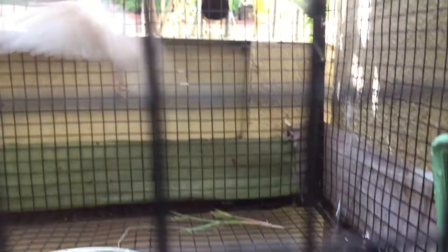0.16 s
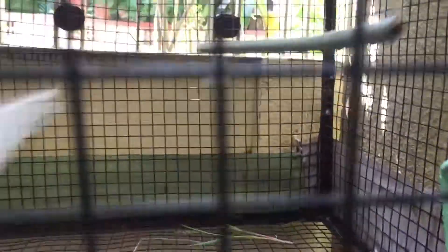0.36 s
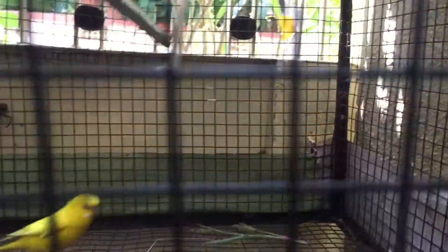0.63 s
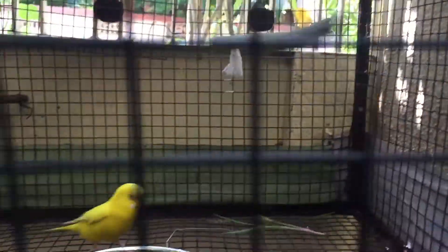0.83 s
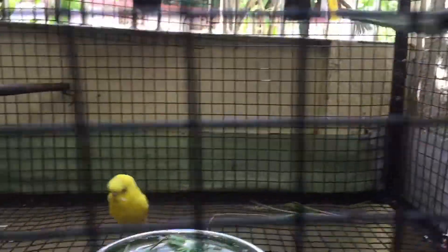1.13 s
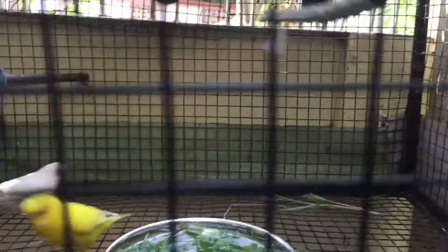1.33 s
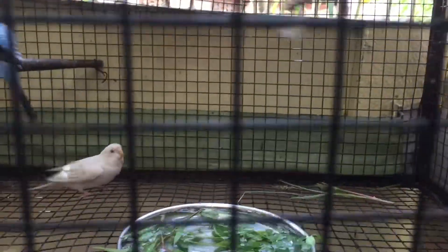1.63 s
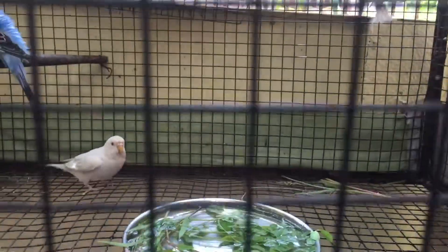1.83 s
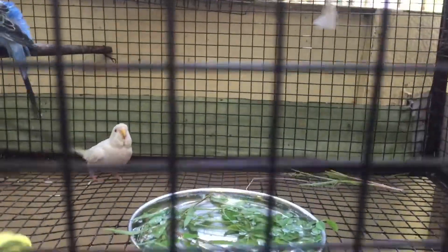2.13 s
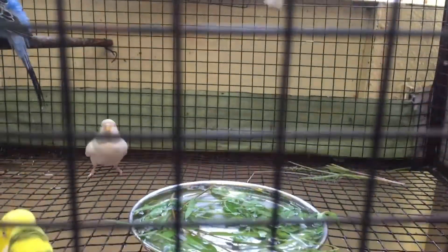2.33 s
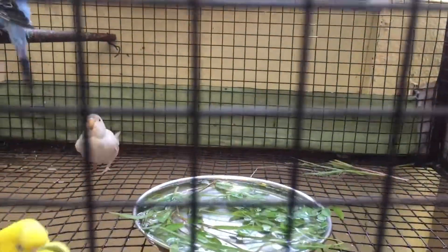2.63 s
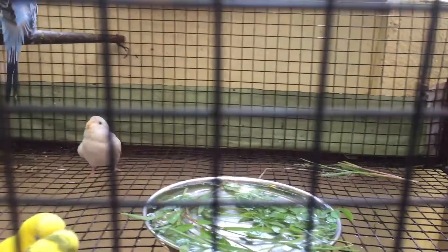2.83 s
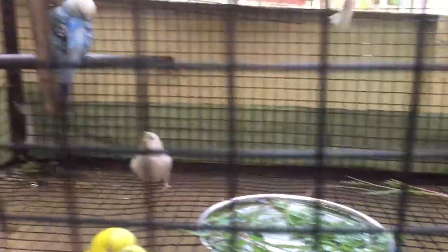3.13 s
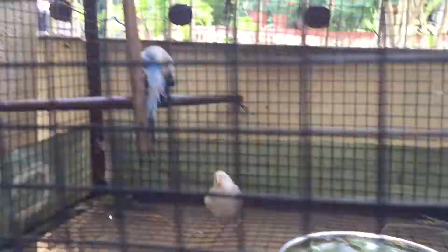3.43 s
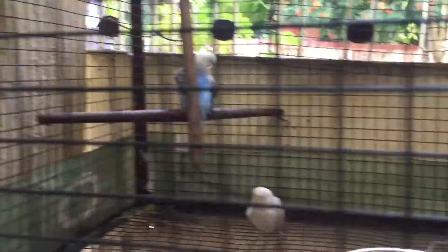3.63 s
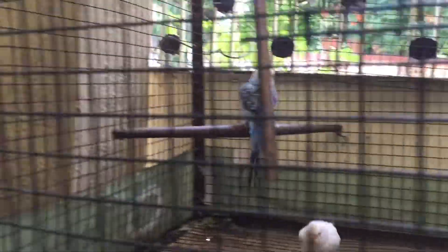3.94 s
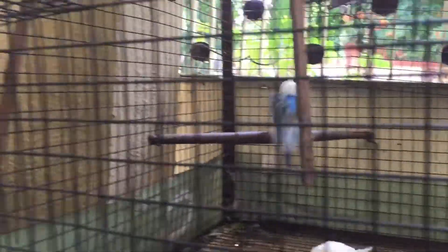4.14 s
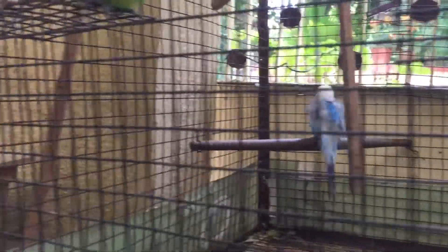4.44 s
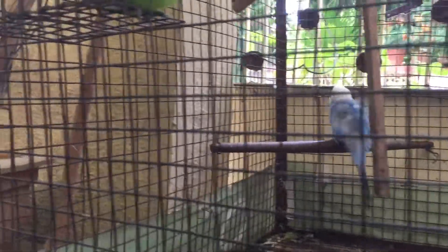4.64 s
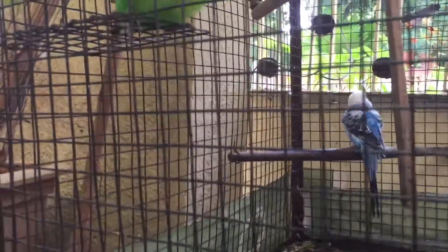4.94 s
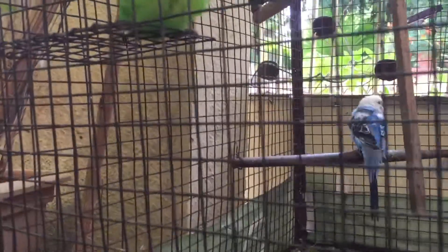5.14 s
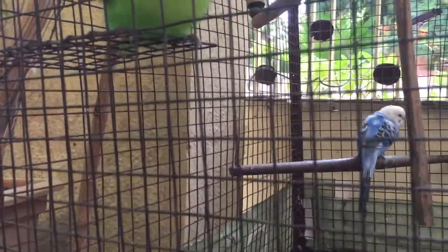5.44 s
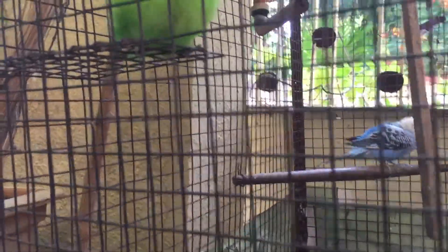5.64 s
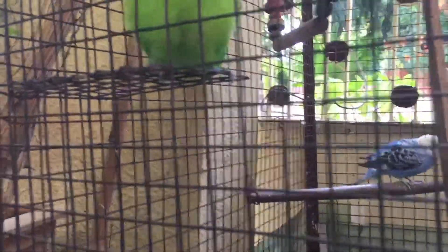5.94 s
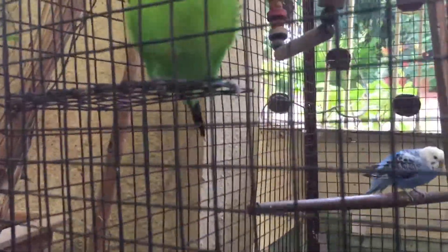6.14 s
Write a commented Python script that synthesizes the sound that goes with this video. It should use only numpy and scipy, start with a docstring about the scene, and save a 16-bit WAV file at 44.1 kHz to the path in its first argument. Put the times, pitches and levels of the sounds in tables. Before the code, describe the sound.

Wing flaps and claw ticks on wire, then chattering budgerigars: gliding chirps, loud raspy squawks, a feather shake, soft rumble behind.

```python
"""Budgerigars chatter in a wire cage on a porch, close to a handheld microphone, over a low outdoor rumble.
First one flies across the cage: shaped noise makes its wings, quickly dying modes its claws on the mesh.
From the start they warble in gliding sums of sines that break into roughness; soft bumps are slow sines.
Short rattling squawks, noise pulsed and filtered by a throat, join next, and thin wavering tones ring.
A feather shake, warbling and soft hisses follow to the end, where a hollow noise drone grows; walls echo."""
import sys
import numpy as np
from scipy import signal
from scipy.fft import rfft, irfft, next_fast_len
from scipy.io import wavfile
from scipy.ndimage import uniform_filter1d

SR = 44100
rng = np.random.default_rng(int(sys.argv[2]) if len(sys.argv) > 2 else 0)


def generate_wav(signal):
    """Clip the signal to [-1, 1] and save it as 16-bit WAV at the path in sys.argv[1]."""
    frames = np.transpose(np.atleast_2d(signal))
    scaled = np.clip(frames, -1, 1) * 32767
    pcm = np.round(scaled).astype(np.int16)
    wavfile.write(sys.argv[1], SR, pcm)


N = 276507


def gain_of(db):
    """Logarithmic level: decibels to amplitude."""
    return 10 ** (np.asarray(db) / 20)


def evened(x):
    """Normalisation: scales to an rms of one."""
    return x / np.sqrt(np.mean(x ** 2) + 1e-20)


def read(points, hz):
    """Spectral interpolation: reads a table on a log-frequency axis."""
    f, value = np.transpose(points)
    return np.interp(np.log(hz + 1), np.log(f + 1), value)


def level(points):
    """Level contour: gain at every sample from rows of (t/s, level/dB)."""
    return gain_of(np.interp(np.arange(N) / SR, *np.transpose(points)))


def add(mix, s, sound):
    """Superposition: mixes a sound in at time s."""
    part = mix[max(round(s * SR), 0):][:len(sound)]
    part += sound[:len(part)]


def coloured(x, db_at):
    """Linear filtering: multiplies the spectrum of x by a gain in dB given as a function of frequency."""
    size = next_fast_len(len(x) + 512)
    hz = np.fft.rfftfreq(size, 1 / SR)
    return irfft(rfft(x, size) * gain_of(db_at(hz)), size)[:len(x)]


def noise(spectrum):
    """Stationary random noise: white noise filtered to the given spectrum, at an rms of one."""
    return evened(coloured(rng.standard_normal(N), lambda hz: read(spectrum, hz)))


def wander(count, hz):
    """Band-limited random motion: noise mostly slower than hz, at an rms of one."""
    return evened(coloured(rng.standard_normal(count), lambda f: -20 * np.log10(1 + (f / hz) ** 4)))


def edges(t, attack, release):
    """Amplitude envelope: attack, hold and release over the times t."""
    return np.clip(np.minimum(t / attack, (t[-1] - t) / release), 0, 1)


def outdoor_air(level_db=-60.5):
    """Broadband noise of the open air, whose level fluctuates slowly."""
    # spectrum of the air, relative: f/Hz, level/dB
    air_spectrum = [(200, -6), (400, -1.5), (700, -6), (1500, -7), (3400, -12.5), (7000, -23.5),
                    (11000, -30), (15800, -31.5)]
    flicker_db = 0.74 * wander(N, 5.5)
    return gain_of(level_db) * noise(air_spectrum) * gain_of(flicker_db)


def low_rumble(hum_db=-2.5, hum_hz=97, hum_drift=.075, throb_hz=10.7, throb_depth=1.0, rumble_db=-1):
    """Low-frequency noise with an amplitude-modulated hum, whose pitch and throb drift together."""
    # spectrum of the rumble, relative: f/Hz, level/dB
    rumble_spectrum = [(15, -59), (27, -32.5), (38, -12.5), (55, 0), (80, 3), (100, 4), (120, 5.5),
                       (150, -7), (220, -23.5), (400, -41), (800, -80.5)]
    # level contour that scales both noise and hum: t/s, level/dB
    rumble_contour = [(0, -66), (.4, -50), (.8, -58.5), (1.4, -52.5), (2.6, -49.5), (3.6, -57), (4.2, -55),
                      (5.4, -50.5), (6.27, -51.5)]
    pace = np.cumsum(1 + hum_drift * wander(N, 5.4)) / SR
    throb = 1 + throb_depth * np.sin(2 * np.pi * throb_hz * pace)
    hum = np.sin(2 * np.pi * hum_hz * pace) * throb
    rumble = gain_of(rumble_db) * noise(rumble_spectrum)
    return level(rumble_contour) * (rumble + gain_of(hum_db) * hum)


def hollow_drone():
    """Band-shaped noise above the rumble, randomly modulated in level and growing toward the end."""
    # spectrum of the drone, relative: f/Hz, level/dB
    drone_spectrum = [(90, -27.5), (160, -1), (205, 1.5), (270, -7), (345, 0), (450, -21), (900, -44.5),
                      (2000, -80)]
    # level contour of the drone: t/s, level/dB
    drone_contour = [(0, -66), (.5, -53.5), (.75, -61.5), (2.3, -61), (2.6, -53), (2.9, -61), (4.8, -62),
                     (5.4, -51.5), (5.95, -60.5), (6.25, -44)]
    flicker_db = 3.9 * wander(N, 9.5)
    return level(drone_contour) * noise(drone_spectrum) * gain_of(flicker_db)


def whistle(s, length, first_hz, last_hz, db, swell_db, roughness, overtone_db,
            chaos_hz=800, flutter_db=1.6, overtone_fall_db=7, hiss_db=-38):
    """Two oscillators: both sides of the syrinx follow one glide; the second joins as the note roughens."""
    # what the beak lets out of a whistle: f/Hz, gain/dB
    beak = [(500, -24.5), (900, -7), (2800, 5), (4300, 7), (5200, 0), (7000, -1.5), (9300, 6.5),
            (10400, -9), (11200, -12.5), (16000, -16)]
    glide_ease = 1.7  # a note glides fast at first, then settles on its last pitch
    attack_s, release_s = 0.0023, 0.0025
    catch_rough, catch_s = 0.092, 0.0026  # each note starts rougher; the excess decays exponentially
    jitter, shimmer, waver = .21, .45, .014  # relative rms depths; roughness scales the first two
    t = np.arange(0, length, 1 / SR)
    glide = last_hz + (first_hz - last_hz) * (1 - t / length) ** glide_ease
    hz = glide * (1 + waver * wander(len(t), 200))
    rough = np.clip(roughness + catch_rough * np.exp(-t / catch_s), 0, 1)

    # six harmonics, weighted by the beak, none above half the sample rate
    k = np.arange(1, 7)[:, None]
    source_db = (k > 1) * (overtone_db - overtone_fall_db * (k - 2))
    partials = gain_of(source_db + read(beak, k * hz)) * (k * hz < SR / 2)
    partials /= np.sqrt((partials ** 2).sum(0) / 2) + 1e-9

    # the second side takes a larger share as the note roughens
    second_share = np.clip(.9 * rough, 0, .7)
    sides = (np.sqrt(1 - second_share ** 2), rough), (second_share, .5 * rough + .4)
    tone = 0
    for share, unrest in sides:
        side_hz = hz * (1 + jitter * unrest * wander(len(t), chaos_hz))
        phase = 2 * np.pi * np.cumsum(side_hz) / SR
        tone = tone + share * (partials * np.sin(k * phase)).sum(0)

    flutter = gain_of(flutter_db * wander(len(t), 160))
    shake = (1 + shimmer * rough * wander(len(t), chaos_hz)) * flutter
    breath = evened(coloured(rng.standard_normal(len(t)), lambda f: read(beak, f)))
    hiss = gain_of(hiss_db) * (1 + 8 * rough) * breath
    swell = gain_of(db + swell_db * (t / length - .5))
    return s, swell * edges(t, attack_s, release_s) * (tone * shake + hiss)


def early_echoes(s, call):
    """Comb interference: each note gets three early echoes at random delays, which beat against the glide."""
    heard = np.pad(call, (0, SR // 50))
    for delay in rng.uniform(.003, .011, size=3):
        add(heard, delay, .17 * call)
    return s, heard


def soft_hiss(s, length, db, bright_db, flicker_db=2.0, flicker_hz=31):
    """Filtered noise under an envelope: an uneven, dull or bright rush that starts quickly and dies down."""
    # spectrum of the hisses before the brightness tilt, relative: f/Hz, level/dB
    hiss_spectrum = [(100, -12), (350, 1), (700, 1), (1300, -6), (4000, -12.5), (8000, -13), (15000, -15.5)]
    rise_s, fade_db, stop_s = 0.023, -7.5, 0.038  # the fade spans the whole length
    t = np.arange(0, length, 1 / SR)

    def rush_db(hz):
        return read(hiss_spectrum, hz) + bright_db * np.log2(1 + hz / 500)

    rush = evened(coloured(rng.standard_normal(len(t)), rush_db))
    envelope = gain_of(db + fade_db * t / length) * edges(t, rise_s, stop_s)
    return s, envelope * rush * gain_of(flicker_db * wander(len(t), flicker_hz))


def tick(s, db, t60, centre_hz, slope_db=11):
    """Modal decay: a sharp scratch on wire as a dense cluster of quickly dying modes."""
    t = np.arange(0, .1, 1 / SR)

    def modes_db(hz):
        return -slope_db * abs(np.log2((hz + 100) / centre_hz))

    modes = evened(coloured(rng.standard_normal(len(t)), modes_db))
    return s, modes * gain_of(db - 60 * t / t60)


def bump(s, length, db, hz):
    """Low-frequency oscillation: a few slow swings of a dull knock under a half-sine envelope."""
    t = np.arange(0, length, 1 / SR)
    swing = np.sqrt(2) * np.sin(2 * np.pi * hz * t)
    return s, gain_of(db) * np.sin(np.pi * t / length) * swing


def squawk(s, length, db, rate, crest, throat, bright_db, closure,
           open_share=0.79, arch=1, drift=0.034, ripple_db=1.0):
    """Source and filter: brief, chaotic bursts from the syrinx swell and fade through throat resonances."""
    # throat and open beak during a squawk: f/Hz, gain/dB
    open_tract = [(300, -27), (850, -59.5), (1200, -40), (1650, -21), (2300, -13.5), (3000, -3.5),
                  (4600, -6.5), (6000, 0), (6900, 5.5), (7900, -12), (9500, -12.5), (10600, -15),
                  (13000, -22), (15800, -26.5)]
    # the same throat with the beak nearly shut: f/Hz, gain/dB
    shut_tract = [(300, -31.5), (1050, -33.5), (1500, -8.5), (2000, -0.5), (2600, -8), (3900, -5.5),
                  (4600, 7), (5500, -1), (6700, -1.5), (7800, -9.5), (9500, -10), (11500, -20),
                  (15800, -19.5)]
    # soft rasps hiss evenly, loud squawks break into pulses: level/dB, hiss between pulses (0-1)
    pulsing = [(-34.5, 1), (-18.5, 0.32)]
    t = np.arange(0, length, 1 / SR)
    cycle = np.cumsum(rate * (1 + drift * wander(len(t), 85))) / SR % 1
    burst = np.sqrt(abs(np.sin(np.pi * np.minimum(cycle / open_share, 1))))
    between = np.interp(db, *np.transpose(pulsing))
    gate = between + (1 - between) * burst

    # each posture of head and tongue has narrow resonances of its own
    bands = np.arange(0, SR / 2, 260)
    posture = ripple_db * rng.standard_normal(len(bands))

    def tract_db(hz):
        mouth = (1 - closure) * read(open_tract, hz / throat) + closure * read(shut_tract, hz / throat)
        tilt = bright_db * np.log2(np.maximum(hz, 700) / 5000)
        return mouth + np.interp(hz, bands, posture) + tilt

    rasp = coloured(rng.standard_normal(len(t)), tract_db)
    # the membranes swing at full stroke in every burst
    rasp /= np.sqrt(uniform_filter1d(rasp ** 2, size=90) + 1e-12)
    voice = evened(np.tanh(gate * rasp / 4))
    turn = np.interp(t / length, [0, np.clip(crest, .05, .95), 1], [.06, .5, .97])
    swell = abs(np.sin(np.pi * turn)) ** arch
    return s, gain_of(db) * swell * voice


def ringing(s, length, hz, db):
    """Random frequency and amplitude modulation: a faint, thin tone swells, flickers and wavers in pitch."""
    fade_s = .08
    t = np.arange(0, length, 1 / SR)
    turns = np.cumsum(hz * (1 + .012 * wander(len(t), 160))) / SR
    flicker_db = 3.5 * wander(len(t), 45)
    return s, np.sin(2 * np.pi * turns) * gain_of(db + flicker_db) * edges(t, fade_s, fade_s)


def porch(x, wet_db, gap=0.0067):
    """Reverberation: a few near reflections and a sparse tail with a decay time for each frequency."""
    # decay time of the tail: f/Hz, t60/s
    decay = [(200, 0.23), (1000, .35), (2800, 0.29), (6500, 0.29), (9000, .24), (15000, 0.096)]
    # reflections from nearby floor and walls: delay/s, gain (linear)
    reflections = [(.0013, 0.026), (.0031, -.1), (.0058, 0.07), (.0094, 0.071), (0.0157, -0.063)]
    # one impulse of random sign in every 20 samples
    count = SR // 2 // 20
    taps = np.zeros(SR // 2)
    taps[np.arange(count) * 20 + rng.integers(0, 20, count)] = rng.choice([-1, 1], count)
    hz, t, z = signal.stft(taps, SR, nperseg=256)
    fade = gain_of(-60 * t / read(decay, hz)[:, None])
    tail = signal.istft(z * fade, SR, nperseg=256)[1]
    response = np.zeros(SR)
    add(response, gap, gain_of(wet_db) * tail / np.linalg.norm(tail))
    for delay, gain in reflections:
        add(response, delay, np.array([gain]))
    return x + signal.fftconvolve(x, response)[:N]


def scene(warble_wet_db=-15, squawk_wet_db=-17):
    """Direct-to-reverberant ratio: the squawker is near; warblers sit deeper, where walls answer more."""
    # warble, and one rough low burst within the feather shake at 4.55 s: t/s, length/s, first f/Hz,
    # last f/Hz, level/dB, swell over the note/dB, roughness (0-1), overtone strength before the beak/dB
    notes = [ (0, 0.015, 3004, 2830, -24.5, -5, .1, -23.5), (0.012, 0.017, 2840, 2780, -29.5, 4, 0.59, -17),
             (.754, 0.012, 2260, 2495, -37.5, -4, 0.15, -1.5),
             (0.765, 0.049, 3510, 3120, -31, 4, 0.13, -11),
             (0.817, 0.032, 2954, 2750, -25.5, 11, 0.11, -15.5),
             (.846, 0.0084, 2190, 2070, -31.5, -6, 0.08, -19),
             (0.85, 0.032, 4520, 2900, -25.5, -6, 0.24, -17.5),
             (.88, 0.0086, 3240, 3920, -25.5, 0, .45, -28),
             (.885, 0.019, 1850, 1720, -33.5, -5, 0.28, -7.5), (0.898, 0.037, 2335, 2334, -26, 5, 0.1, -24),
             (0.927, 0.0067, 2030, 2000, -27.5, 0, 0.1, -9.5),
             (0.932, 0.029, 3463, 3036, -20.5, -3, 0.13, -16.5),
             (.959, 0.011, 3170, 4205, -22, -7, 0.3, -21), (1.15, 0.022, 932, 1096, -41, 5, 0.41, -3),
             (1.178, 0.045, 1660, 1780, -35, 2, 0.08, -1), (1.56, 0.016, 4540, 2910, -40, 7, 0.37, -5),
             (1.573, 0.06, 2007, 2250, -36, 2, 0.16, -18), (1.624, 0.077, 1960, 2073, -33, 0, 0.14, -25),
             (1.689, 0.0079, 1950, 1690, -32.5, 0, 0.17, -29),
             (1.623, .011, 4370, 2990, -42, -5, 0.27, -10),
             (1.634, 0.06, 3450, 2520, -34.5, 16.5, 0.07, -23),
             (1.698, 0.05, 3080, 2458, -27, 3, 0.13, -25), (1.751, 0.018, 2460, 1986, -33, -7, 0.16, -29),
             (2.064, 0.033, 1150, 948, -38, 12, 0.66, -2.5),
             (2.104, 0.018, 2010, 2280, -32.5, 3, 0.28, -13.5),
             (2.122, 0.036, 3300, 3014, -25.5, 3.5, .1, -24.5),
             (2.163, 0.038, 2910, 2842, -17.5, -0.5, 0.02, -27),
             (2.201, 0.025, 3650, 3090, -24.5, -4, 0.28, -22), (2.218, .022, 2265, 2080, -35, -7, 0.49, -9),
             (2.25, 0.029, 2268, 2515, -28, 3, .45, -14), (2.278, 0.032, 3330, 2946, -24, -10, 0.01, -22),
             (2.581, 0.037, 2000, 1967, -24.5, 2, 0.17, -1), (2.617, 0.015, 2650, 2850, -25, -4, 0.3, -11),
             (2.633, 0.044, 3450, 2540, -27, -3, .35, -20), (3.043, 0.017, 1012, 1420, -46, -6, 0.97, -7.5),
             (3.061, 0.057, 1936, 1566, -40, 4.5, 0.22, -27),
             (3.119, 0.015, 1590, 2160, -46, 0, 0.2, -16.5),
             (3.141, 0.026, 2715, 2480, -44, -2.5, .15, -25.5),
             (3.158, 0.025, 1930, 2260, -43, 2.5, 0.2, -25.5),
             (3.181, .041, 1550, 1665, -43.5, 1, 0.17, -18), (3.226, 0.015, 2100, 1700, -47.5, 0, 0.2, -14),
             (3.24, .022, 1693, 2160, -44, 3, 0.07, -23), (3.263, 0.023, 1805, 1940, -47.5, 2, .25, -11),
             (3.951, 0.018, 805, 1060, -37, -2, 0.03, -5), (4.231, 0.019, 1730, 1690, -40.5, 2, 0.11, -12),
             (4.249, 0.043, 3155, 3195, -31.5, 9, 0, -16), (4.281, 0.05, 3000, 2460, -36, 10, 0.12, -19),
             (4.33, 0.016, 3000, 4300, -43.5, -14, 0.2, -13), (4.358, 0.017, 2090, 1880, -27, 6, 0.02, 2),
             (4.369, 0.028, 2230, 2185, -28.5, -3, 0.06, -3),
             (4.555, .13, 1350, 1247, -52, -15.5, 0.84, -12.5),
             (4.978, 0.0178, 2210, 2600, -40.5, 2, 0.28, 1),
             (5.003, 0.081, 3164, 2636, -38.5, 4, 0.13, -19),
             (5.071, 0.015, 2270, 2110, -38.5, 4, 0.25, -7.5),
             (5.085, 0.039, 3640, 2724, -34, -6, 0.27, -19), (5.118, 0.025, 1670, 1534, -41, -10, .18, -17),
             (5.143, 0.048, 1820, 1987, -45.5, 7, 0.38, -18),
             (5.171, 0.051, 3140, 2717, -43, -1, 0.28, -11), (5.409, 0.0192, 1050, 1292, -49, 6, 0.6, -4),
             (5.424, .052, 1488, 1586, -48, -5, 0.35, -7), (5.565, .045, 1388, 1267, -51, 1.5, .06, -1.5),
             (5.61, 0.054, 1180, 1107, -55.5, -4, 0.22, -12),
             (5.661, 0.047, 1342, 1424, -52.5, 4.5, 0.1, -8), (5.708, 0.038, 1405, 1190, -52, 2, 0.17, -11),
             (5.741, 0.0302, 3200, 3213, -39.5, 12, 0.01, 4),
             (5.768, 0.046, 2680, 2160, -40.5, -1, 0.18, -9.5),
             (5.821, 0.019, 2300, 2040, -36, -7, 0.97, 10), (5.836, 0.019, 1740, 2070, -43.5, 3, 0.1, -18),
             (5.837, 0.016, 3630, 3490, -30, 13, .12, -22), (5.85, 0.019, 3420, 3330, -33, -2, .12, -18),
             (5.869, 0.051, 3180, 2873, -26.5, 3.5, .06, -19.5),
             (5.919, 0.035, 3570, 3470, -28.5, 2, 0.4, -15), (5.941, 0.019, 1860, 1710, -35, -5, 0, -7),
             (5.959, 0.027, 2330, 2426, -29, 0, 0.1, -24), (5.982, 0.014, 1967, 1770, -34.5, -2, 0.87, 4),
             (5.989, .041, 3450, 2934, -26.5, 8.5, 0.06, -18), ]
    # soft broadband hisses, some from wings and ruffled feathers:
    # t/s, length/s, level/dB, brightness/(dB per octave)
    hisses = [(0, 0.36, -57.5, -1), (0.287, 0.26, -46.5, 0.5), (0.561, 0.21, -52, 0.5),
              (0.711, 0.24, -56.5, 3), (1.024, 0.079, -52, 0.5), (1.1, .08, -43.5, 1.5),
              (1.198, 0.63, -60, -0.5), (1.411, 0.054, -53, 1), (3.004, 0.19, -60, 5), (4.092, 0.2, -58, 3),
              (4.252, 0.32, -59.5, 1.5), (4.541, 0.18, -51, -0.5), (4.67, 0.21, -54.5, -2.5),
              (4.957, 0.17, -55, -1), (5.147, .14, -51, 2), (5.27, .5, -59, -3), (5.737, 1, -54.5, 2)]
    # claws and wing tips on the mesh: t/s, level/dB, ring time t60/s, centre f/Hz
    ticks = [(.111, -45, 0.043, 5140), (0.17, -39.5, 0.01, 8400), (.236, -40.5, 0.045, 11000),
             (0.308, -27.5, 0.048, 6040), (0.345, -43, 0.053, 4530), (0.369, -37.5, 0.034, 6300),
             (.399, -39, 0.16, 5600), (.420, -27, 0.032, 5030), (0.472, -36.5, 0.046, 4700),
             (0.501, -47, 0.072, 6400), (.581, -46, 0.037, 2800), (0.595, -44, .06, 6500),
             (0.62, -40.5, 0.061, 8600), (4.0816, -32, 0.061, 5200), (4.792, -49.5, .03, 3000)]
    # hand on the microphone: t/s, length/s, level/dB, f/Hz
    bumps = [(1.033, 0.078, -42, 61.6), (2.741, 0.11, -44.5, 54.3), (5.05, 0.095, -40, 89.3),
             (5.534, 0.12, -43, 81)]
    # squawks, soft rasps, and the harsh start of a feather shake at 4.54 s:
    # t/s, length/s, level/dB, pulse rate/Hz, loudest point (share of length),
    # throat size factor (scales resonance frequencies), brightness/(dB per octave), beak closure (0-1)
    squawks = [ (1.159, 0.021, -24, 150, 0.43, 0.83, 0.5, 0.9),
               (1.172, 0.056, -18, 180, 0.42, 0.88, .5, 0.56),
               (1.315, 0.055, -35.5, 210, .25, 0.92, -2.5, 0.67),
               (1.921, 0.053, -58, 200, .34, 1.42, 16, 0.3), (2.065, 0.04, -43, 240, 0.65, 1.25, 2.5, 1),
               (2.24, 0.071, -15, 167, 0.49, 0.98, 1.5, 0.3), (2.383, .065, -13, 166, 0.49, 0.95, 1, 0.19),
               (2.503, 0.085, -11.5, 131, 0.7, 0.94, 0.5, 0.2),
               (2.592, 0.079, -33.5, 200, .43, 0.77, 2.5, 0), (2.662, 0.073, -13, 170, 0.47, 0.99, 0, 0.05),
               (2.8407, 0.077, -12.5, 141, 0.43, 0.94, 1, 0.11),
               (3.286, .068, -10.5, 162, 0.36, .94, 1.5, 0.37),
               (3.439, .066, -12, 170, 0.39, 0.93, 1, 0.24), (3.584, 0.06, -29, 500, 0.39, 1.02, 0, 0.94),
               (3.644, .062, -8, 192, 0.7, 0.96, 0.7, 0), (3.714, .053, -30, 250, 0.73, .97, 0.5, 1),
               (3.852, 0.086, -26.5, 123, 0.44, 0.96, .5, 0.6),
               (3.949, 0.024, -27.5, 220, 0.085, 0.74, -1, 0.4),
               (3.969, 0.055, -17, 163, 0.22, 0.93, 0, 0.36),
               (4.544, 0.066, -40.5, 170, 0.15, 0.71, 0.5, 0.92),
               (5.515, 0.032, -47, 290, 0.48, .91, -8.5, 0.5), (5.982, .04, -30, 175, .22, 0.97, -3, 0.92),
               (6.1688, .042, -20.5, 160, 0.38, 0.86, -0.5, 0.13), ]
    # thin high ringing: t/s, length/s, f/Hz, level/dB
    rings = [(1.789, 0.45, 3350, -59), (1.786, 0.45, 3758, -65.5), (2.988, .33, 3750, -51.5)]
    near, far = np.zeros((2, N))
    background = outdoor_air() + low_rumble() + hollow_drone()
    for row in notes:
        add(far, *early_echoes(*whistle(*row)))
    for row in hisses:
        add(near, *soft_hiss(*row))
    for row in ticks:
        add(near, *tick(*row))
    for row in bumps:
        add(background, *bump(*row))
    for row in squawks:
        add(near, *squawk(*row))
    for row in rings:
        add(near, *ringing(*row))
    return (porch(near, squawk_wet_db) + porch(far, warble_wet_db) + background)[None]


def record(dry):
    """Saturation and band limiting: the loudest peaks round off at full scale, then a low-pass filter."""
    edge_hz = 15950
    rounded = dry / (1 + dry ** 8) ** (1 / 8)
    lowpass = signal.firwin(511, edge_hz, window=("kaiser", 9), fs=SR)
    return signal.oaconvolve(rounded, lowpass[None], "same")


dry = scene()
out = record(dry)
generate_wav(out)
```